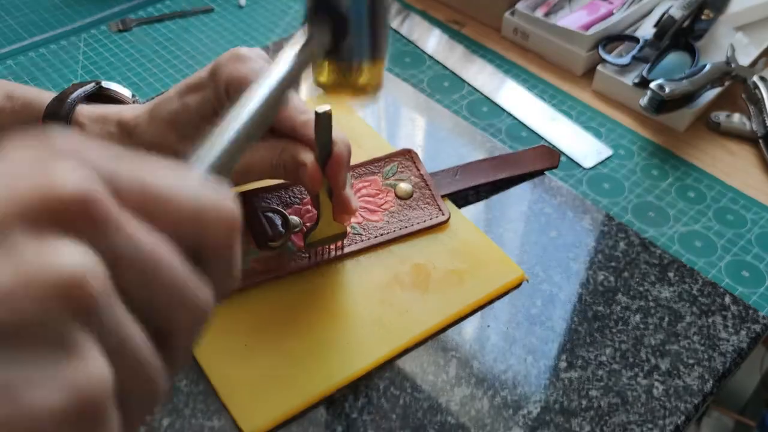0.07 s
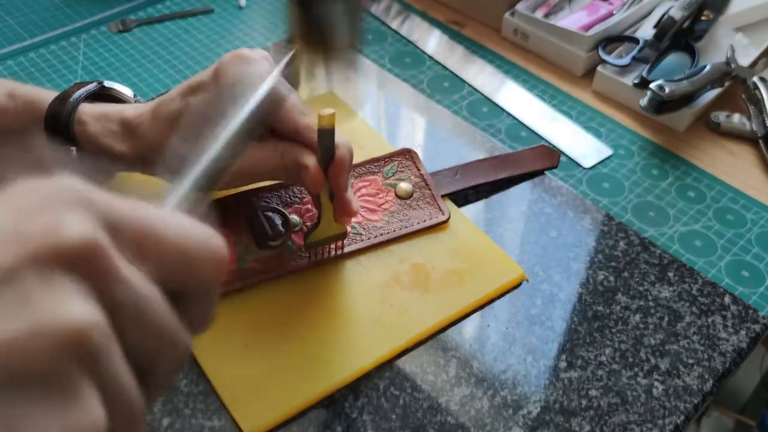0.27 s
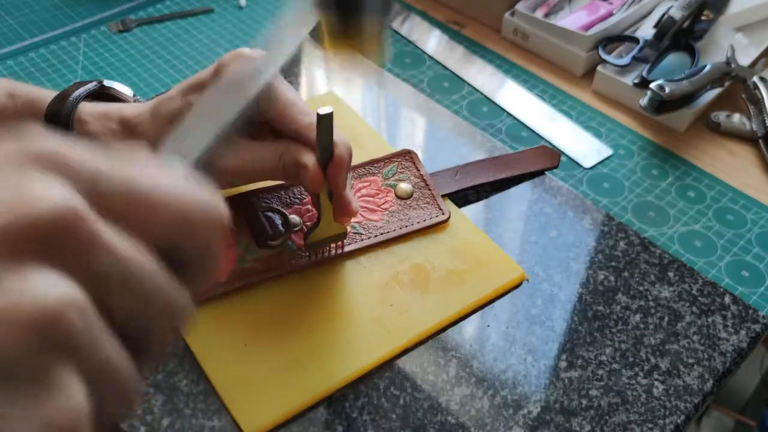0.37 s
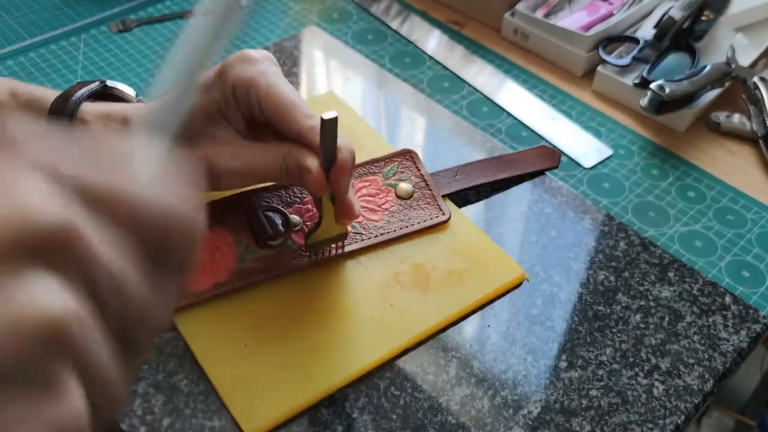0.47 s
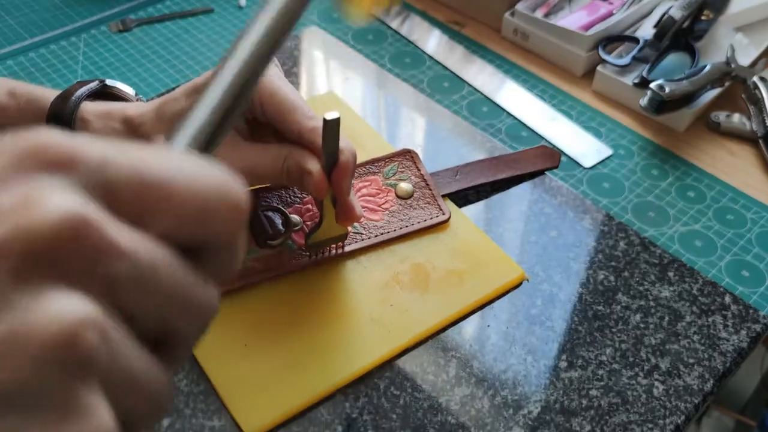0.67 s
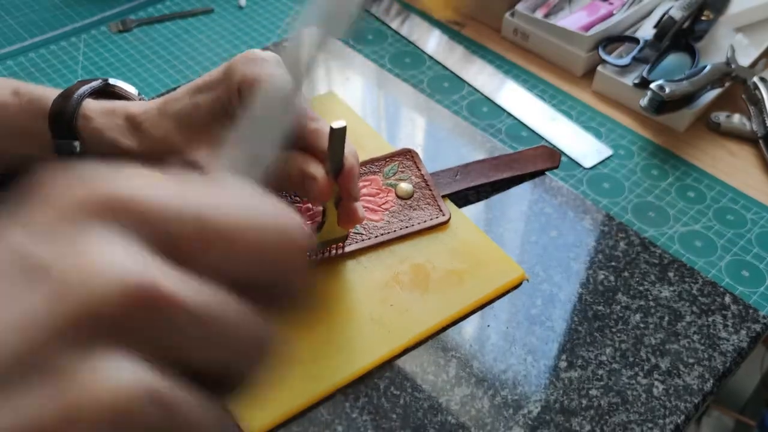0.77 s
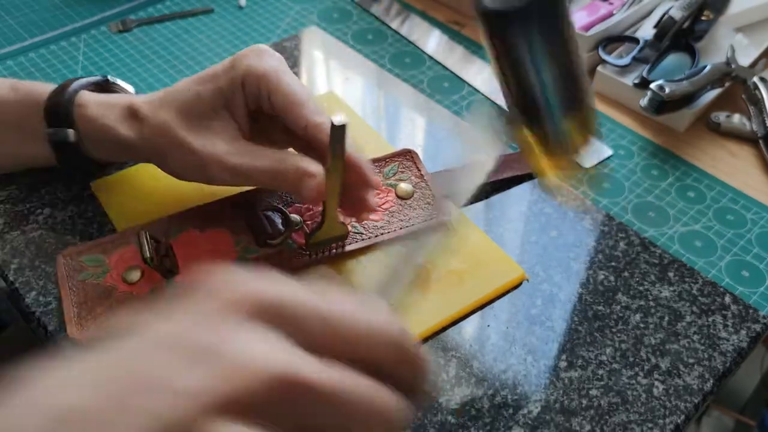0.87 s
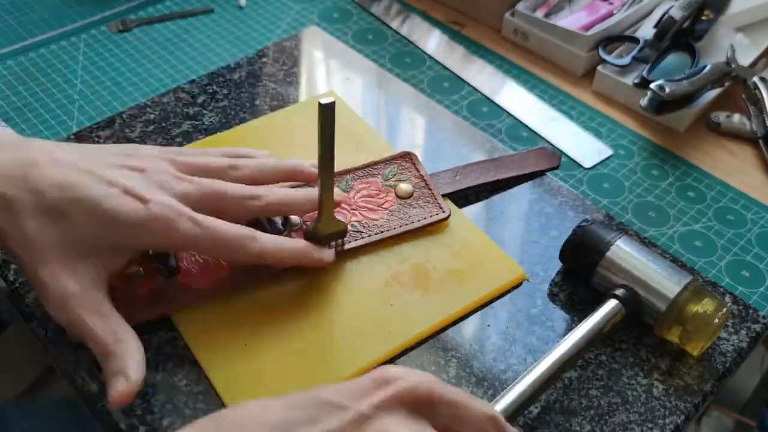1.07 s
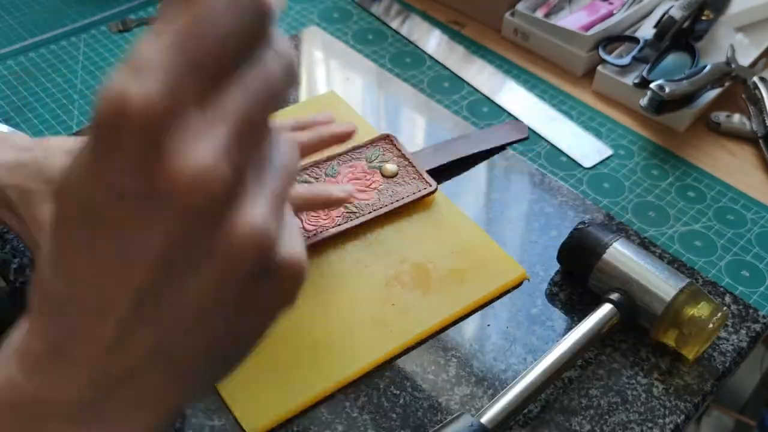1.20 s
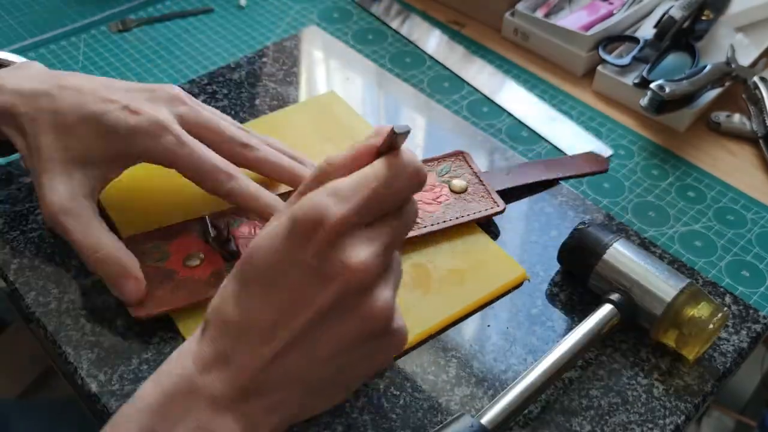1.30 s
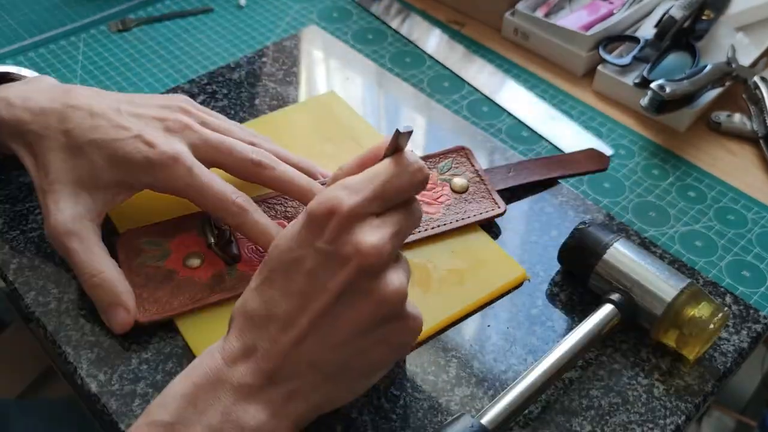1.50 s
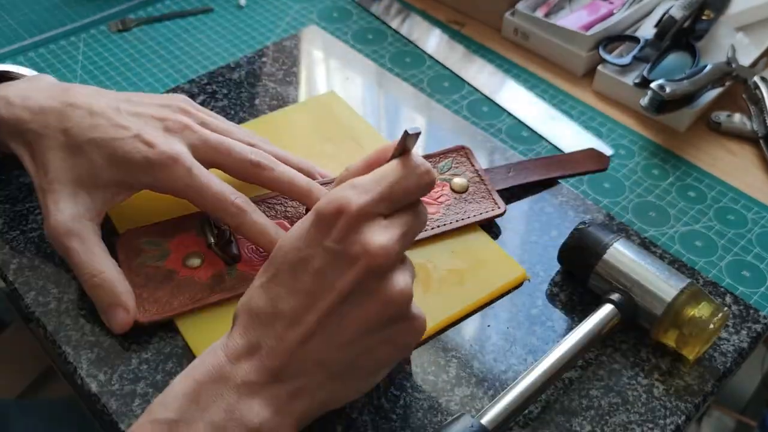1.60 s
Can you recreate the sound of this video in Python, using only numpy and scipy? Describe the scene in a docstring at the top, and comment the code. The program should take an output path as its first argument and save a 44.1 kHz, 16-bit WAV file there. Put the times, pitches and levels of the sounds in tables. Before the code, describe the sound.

Close by in a small room, three sharp mallet strikes on a metal punch crack, thump and ring briefly, rattling tools on the bench. Then the mallet is put down on stone with softer knocks and a short, squeaky drag.

```python
"""A small workroom: a mallet drives a steel punch through leather on a stone slab, three times.
Each blow cracks, thumps the slab, and rings the steel and the bench; loose tools rattle after it.
The mallet is then laid on the stone, where it knocks and drags with a short squeal.
Hands brush the leather faintly, over a steady room tone."""
import sys
import numpy as np
from scipy import signal
from scipy.io import wavfile

SR = 44100
rng = np.random.default_rng(int(sys.argv[2]) if len(sys.argv) > 2 else 0)


def output_pcm(signal):
    """Save a mono or channel-first signal as 16-bit PCM at the path in sys.argv[1].

    Samples are clipped to [-1, 1] before scaling.
    """
    pcm = np.clip(np.atleast_2d(signal).T, -1, 1) * 32767
    wavfile.write(sys.argv[1], SR, np.round(pcm).astype(np.int16))


N = 72765
T = np.arange(N) / SR

# stereo noise: (frequency [Hz], left-right correlation [0..1])
COHERENCE = [(60, 0.69), (300, 0.85), (700, 0.27), (1500, 0.074), (4000, 0.026), (12000, 0)]
# room tone: (frequency [Hz], density [dB])
AIR_SPECTRUM = [(15, -41), (25, -6.5), (108, -1.5), (344, -12), (503, -16.5), (659, -13.5), (775, -16),
                (840, -13.5), (1440, -19.5), (6740, -36), (16000, -31)]
# hand strokes: (centre [s], Gaussian sigma [s], level [dB])
STROKES = [(.015, 0.0033, -67.5), (0.904, 0.023, -71), (1.01, 0.0018, -64), (1.195, 0.019, -59),
           (1.309, 0.014, -65.5), (1.373, 0.0047, -62.5)]
# hand on leather: (frequency [Hz], density [dB])
STROKE_SPECTRUM = [(300, -6), (1300, 3.5), (2700, 3), (5000, -1.5), (9000, -4), (16000, -31)]

# blows: (time [s], level [dB], crack offset [dB], upper steel offset [dB])
PUNCH_BLOWS = [(0.0623, -1.5, -5, 0), (0.3336, -0.5, -0.5, 6), (0.5648, 0, -5.5, -4)]
# contact crack: (frequency [Hz], density [dB])
CRACK_SPECTRUM = [(600, -15), (1200, -12), (2500, 0), (4500, 2.5), (7000, -8), (9500, -2.5), (12000, -17),
                  (16000, -16.5)]
# mallet face on punch: (frequency [Hz], level [dB], t60 [s])
CLACK_MODES = [(1229, -6.5, 0.012), (1730, -7, 0.0072), (2390, -3, 0.0054), (4361, -12, 0.0038)]
# slab thud: (frequency [Hz], level [dB], t60 [s])
SLAB_MODES = [(178, -14, 0.013), (294, -10.5, 0.025)]
# thud off near surfaces: (delay [s], level [dB], right lag [s])
SLAB_ECHOES = [(.0083, -13, .0001), (.0124, -5.5, -.0001), (0.0215, -6.5, .0001), (0.0248, -14.5, 0)]
# bench top: (frequency [Hz], level [dB], t60 [s])
BENCH_MODES = [(93.5, -32, .24), (118.5, -31, 0.37), (167.1, -27, 0.26), (189.5, -36.5, .45),
               (241, -30, 0.15), (266.1, -26, 0.25), (326, -32, 0.19), (352.5, -28, 0.26),
               (454, -27.5, 0.19), (604, -35.5, .15), (712, -31.5, 0.058), (851.4, -41.5, .25),
               (1179, -33.5, .15)]
# whole bench swaying: (frequency [Hz], level [dB], t60 [s])
BOOM_MODES = [(38, -27, 0.29), (52.3, -33.5, 0.42), (66, -36, 0.62)]
# steel of the mallet, rung by each blow: (frequency [Hz], level [dB], t60 [s], left minus right [dB])
STEEL_MODES = [(1739, -19.5, .14, -5), (1980, -33, .13, 0), (2191, -33, .11, 0), (2714, -33, .12, 0),
               (3052, -28.5, .16, -5), (5365, -49, .24, 0), (6880, -48, .2, 0), (8650, -43, .2, 3),
               (10057, -46, .18, 3)]
# reverb: (frequency [Hz], density [dB], t60 [s])
ROOM_BANDS = [(40.4, -13, .8), (170, -3, 0.49), (324, -3, .36), (563.5, -2.5, 0.33), (1205, -12, 0.32),
              (2160, -1, 0.2), (3535, -11, 0.27), (6500, -17, 0.29), (8850, -8.5, .22), (11100, -21, 0.21),
              (16060, -19, 0.14)]
# loose tools: (time [s], level [dB], band centre [Hz])
TOOL_RATTLES = [(.140, -33, 950), (.424, -33, 950), (.476, -37, 900), (.512, -43, 900), (.600, -21, 1250),
                (.651, -33, 950), (.697, -41, 900)]

# mallet meets stone: (time [s], level [dB], click offset [dB])
HEAD_TOUCHES = [(1.0467, -20, -46), (1.0741, -16, -14.5), (1.0827, -24.5, -14.5), (1.1252, -24, -15.5)]
# head on stone: (frequency [Hz], level [dB], t60 [s])
HEAD_MODES = [(112, -15.5, 0.062), (307, -32.5, .03), (367, -8, 0.027), (630, -6, 0.016), (830, -18, 0.012),
              (2170, -30, 0.023), (3330, -31, 0.034), (3720, -44, 0.044)]
# touch click: (frequency [Hz], density [dB])
CLICK_SPECTRUM = [(1000, -15), (2300, 10), (3700, 1.5), (5500, -11), (8000, -1), (11000, -34), (16000, -29)]
# head dragging: (frequency [Hz], density [dB])
DRAG_SPECTRUM = [(50, 9), (110, 4), (350, 6.5), (550, -3.5), (850, 2), (1300, -15), (4000, -32),
                 (9000, -39), (16000, -61)]
# steel scraping stone: (frequency [Hz], density [dB])
SCUFF_SPECTRUM = [(2000, -12), (3800, 7), (5500, -8), (8200, -2), (11000, -22), (16000, -18)]
# drag squeal: (time [s], level [dB])
SQUEAL_ENVELOPE = [(1.028, -69), (1.034, -34), (1.044, -37.5), (1.051, -29), (1.06, -28.5), (1.068, -45.5),
                   (1.095, -40.5), (1.103, -32.5), (1.112, -35.5), (1.128, -34), (1.136, -61)]
# squeal tones: (frequency [Hz], level [dB], left minus right [dB])
SQUEAL_PARTIALS = [(1440, -6, 15.5), (1770, -24, -17.5)]

# microphone ports, left then right: (frequency [Hz], gain [dB], width [Hz])
MIC_PORTS = [(9263, 6, 2800), (8850, -7, 4600)]

RIGHT_LAG_S, BODY_LAG_S = 0.00015, 0.0003
RADIATION_LOW_HZ = 72.4  # the slab radiates little below this


def from_db(db):
    """Decibels to gain."""
    return 10 ** (np.asarray(db) / 20)


def at_hz(points, hz, column=1):
    """Table column interpolated over log frequency."""
    table = np.array(points)
    return np.interp(np.log(hz), np.log(table[:, 0]), table[:, column])


def butter(x, hz, kind):
    """Butterworth filter, order 2."""
    return signal.sosfilt(signal.butter(2, hz, kind, fs=SR, output="sos"), x)


def pan(side_db):
    """Stereo gains for a left-minus-right level."""
    return from_db(np.array([[side_db], [-side_db]]) / 2)


def since(time_s, right_lag_s=0):
    """Time since an event, left and right."""
    return np.array([T - time_s, T - time_s - right_lag_s])


def ramp(t, rise_s):
    """Linear rise from 0 to 1."""
    return np.clip(t / rise_s, 0, 1)


def decay(t, t60_s):
    """Exponential decay, silent before t = 0."""
    return (t >= 0) * np.exp(-np.log(1000) * np.clip(t / t60_s, 0, 10))


def ring(t, hz, t60_s):
    """One struck mode."""
    return np.sin(2 * np.pi * hz * t) * decay(t, t60_s)


def knock(t, modes):
    """A struck surface first moves away, then swings in its modes."""
    return -sum(from_db(db) * ring(t, hz, t60_s) for hz, db, t60_s in modes)


def struck(t, modes):
    """Modes of one body, neighbours in opposite phase."""
    return sum((-1) ** k * from_db(db) * ring(t, hz, t60_s) for k, (hz, db, t60_s) in enumerate(modes))


def noise_bands(spectrum):
    """Half-octave stereo noise, joint rms 1: (centres [Hz], bands)."""
    edges_hz = np.geomspace(22, 17500, 21)
    centres_hz = np.sqrt(edges_hz[1:] * edges_hz[:-1])
    white, bands = rng.standard_normal((2, 2, N)), []
    for k, hz in enumerate(centres_hz):
        mid, side = butter(white[k % 2], edges_hz[k:k + 2], "band")
        alike = at_hz(COHERENCE, hz)
        stereo = np.sqrt(1 + alike) * mid + np.sqrt(1 - alike) * side * [[1], [-1]]
        bands.append(from_db(at_hz(spectrum, hz)) * stereo)
    return centres_hz, np.array(bands) / np.std(sum(bands))


def noise(spectrum):
    """Coloured stereo noise, rms 1."""
    return noise_bands(spectrum)[1].sum(axis=0)


def hands():
    """Soft swells of friction on the leather."""
    swells = sum(from_db(db) * np.exp(-((T - centre_s) / sigma_s) ** 2 / 2)
                 for centre_s, sigma_s, db in STROKES)
    return noise(STROKE_SPECTRUM) * swells


def crack_envelope(t):
    """Hard contact, its echo off the nearest surface, and early reflections."""
    direct, echo = (from_db(-8) * ramp(age, rise_s=0.000067) * decay(age, t60_s=0.006)
                    for age in (t, t - 0.011))
    early = from_db(-22.5) * decay(t, t60_s=0.026)
    return direct + from_db(-12) * echo + early


def strike_response(boom_delay_s=0.02):
    """Common to all blows: damped clack, slab thud with echoes, bench ring and late boom."""
    t = since(BODY_LAG_S, RIGHT_LAG_S)
    clack = butter(struck(t, CLACK_MODES), hz=875, kind="high")
    thud = knock(t, SLAB_MODES)
    for delay_s, db, lag_s in SLAB_ECHOES:
        thud += from_db(db) * knock(since(delay_s, lag_s), SLAB_MODES)
    bench = struck(t, BENCH_MODES)
    late = t - boom_delay_s
    boom = ramp(late, rise_s=0.03) * knock(late, BOOM_MODES)
    return clack + butter(thud + bench, RADIATION_LOW_HZ, "high") + boom


def punch(upper_steel_hz=2800):
    """Each blow: strike response, finger-damped steel, crack, and a ping along the punch."""
    grit, body, out = noise(CRACK_SPECTRUM), strike_response(), np.zeros((2, N))
    for time_s, db, crack_db, upper_db in PUNCH_BLOWS:
        start, t = int(time_s * SR), since(time_s, RIGHT_LAG_S)
        out[:, start:] += from_db(db) * body[:, :N - start]
        for hz, mode_db, t60_s, side_db in STEEL_MODES:
            gain = from_db(db + mode_db + upper_db * (hz > upper_steel_hz))
            out += gain * pan(side_db) * ring(t, hz, t60_s)
        ping = from_db(-4.5) * ring(t, hz=9330, t60_s=0.0032)
        out += from_db(db + crack_db) * (grit * crack_envelope(t) + ping)
    return out


def room_reverb(send_db=-21.5):
    """Diffuse tail per blow; lows last longest, a harder crack brightens it."""
    hz, bands = noise_bands(ROOM_BANDS)
    t60_s = at_hz(ROOM_BANDS, hz, column=2)[:, None, None]
    tails = bands * ramp(T, rise_s=0.0099) * decay(T, t60_s)
    treble, out = np.clip(hz / 9000, 0, 1), np.zeros((2, N))
    for time_s, db, crack_db, _ in PUNCH_BLOWS:
        start = int(time_s * SR)
        band_gains = from_db(send_db + db + treble * crack_db)
        out[:, start:] += np.tensordot(band_gains, tails, 1)[:, :N - start]
    return out


def loose_tools(edge_ratio=1.264):
    """Small dull clacks as tools fall back on the bench."""
    white, out = rng.standard_normal((2, N)), np.zeros((2, N))
    for time_s, db, hz in TOOL_RATTLES:
        band = butter(white, [hz / edge_ratio, hz * edge_ratio], "band")
        envelope = ramp(T - time_s, rise_s=0.0033) * decay(T - time_s, t60_s=0.04)
        out += from_db(db) * band / np.std(band) * envelope
    return out


def mallet_squeal():
    """The head squeals in two tones as it drags on the stone."""
    level_db = np.interp(T, *np.transpose(SQUEAL_ENVELOPE), left=-np.inf, right=-np.inf)
    tones = sum(from_db(db) * pan(side_db) * np.sin(2 * np.pi * hz * T)
                for hz, db, side_db in SQUEAL_PARTIALS)
    return from_db(level_db) * tones


def mallet_laid_down(drag_start_s=1.030, scuff_start_s=1.077, drag_end_s=1.134):
    """The head knocks and drags; its steel scrapes brightly once on the stone."""
    grit, knocks = noise(CLICK_SPECTRUM), np.zeros((2, N))
    for time_s, db, click_db in HEAD_TOUCHES:
        click = from_db(click_db) * grit * decay(T - time_s, t60_s=0.013)
        knocks += from_db(db) * (knock(since(time_s), HEAD_MODES) + click)
    sliding = ramp(np.minimum(T - drag_start_s, drag_end_s - T), rise_s=0.015)
    drag = from_db(-38.5) * noise(DRAG_SPECTRUM)
    scuff = from_db(-52) * (T > scuff_start_s) * noise(SCUFF_SPECTRUM)
    return butter(knocks + sliding * (drag + scuff), RADIATION_LOW_HZ, "high")


def scene():
    """All sources over the room tone."""
    work = punch() + room_reverb() + loose_tools() + mallet_squeal() + mallet_laid_down() + hands()
    return work + from_db(-64) * noise(AIR_SPECTRUM)


def mic_port(x, hz, db, width_hz):
    """Broad peak or dip in one microphone."""
    gain, k = from_db(db / 2), np.tan(np.pi * width_hz / SR)
    tuning = -2 * np.cos(2 * np.pi * hz / SR)
    return signal.lfilter([1 + k * gain, tuning, 1 - k * gain], [1 + k / gain, tuning, 1 - k / gain], x)


def record(dry):
    """Port colour, brief dropout, soft clip, steep low-pass."""
    dip_start_s, dip_end_s, dip_db = 1, 1.005, -30.5
    ceiling, stopband_hz = 0.82, 16900
    x = np.array([mic_port(channel, *port) for channel, port in zip(dry, MIC_PORTS)])
    x *= from_db(dip_db * ((T > dip_start_s) & (T < dip_end_s)))
    x /= (1 + (x / ceiling) ** 6) ** (1 / 6)
    return signal.sosfilt(signal.cheby2(12, 70, stopband_hz, fs=SR, output="sos"), x)


dry = scene()
out = record(dry)
output_pcm(out)
```